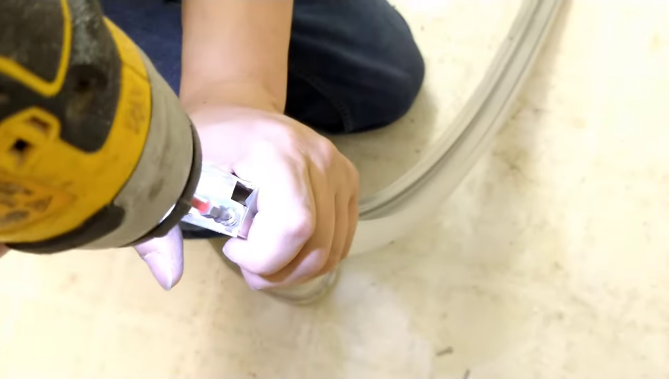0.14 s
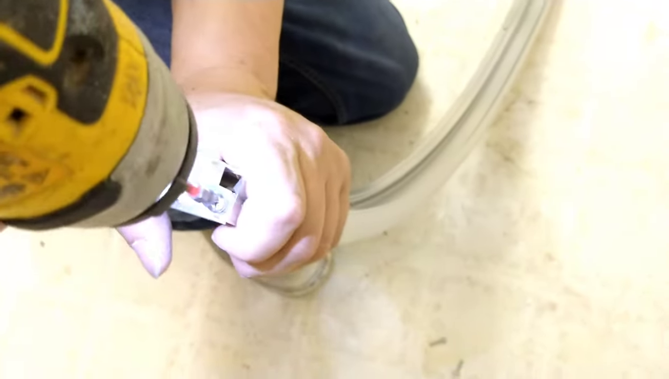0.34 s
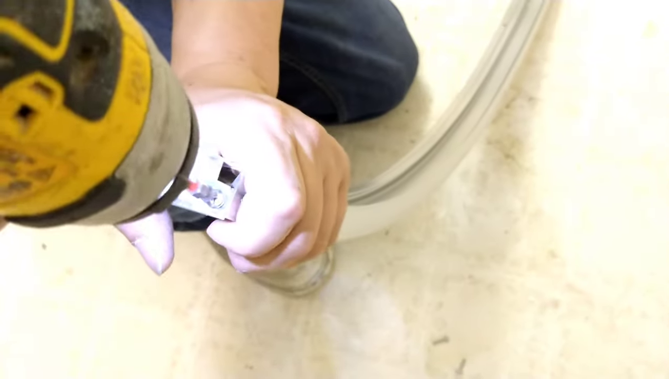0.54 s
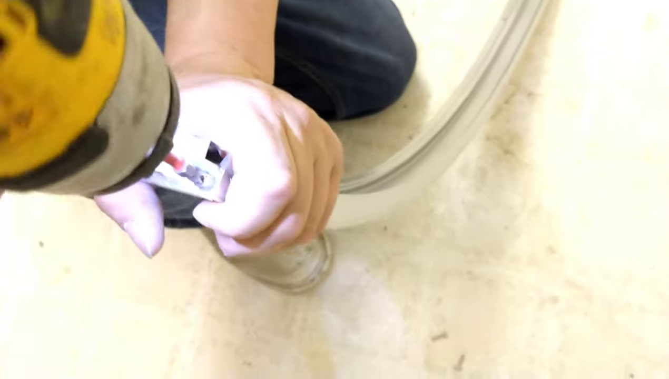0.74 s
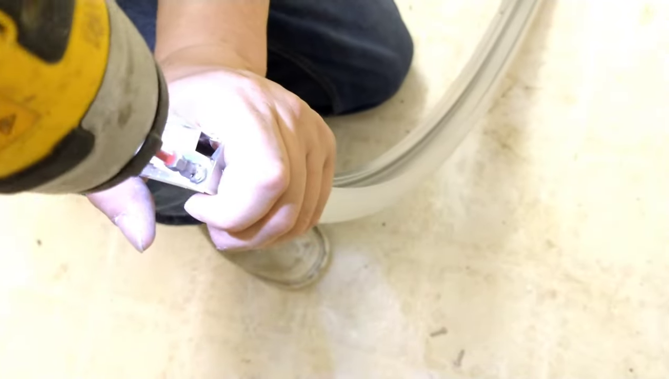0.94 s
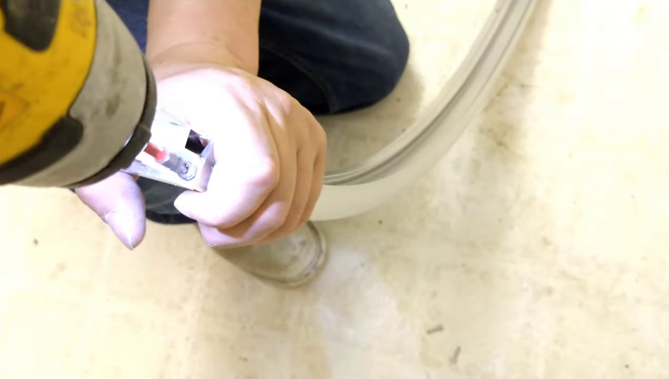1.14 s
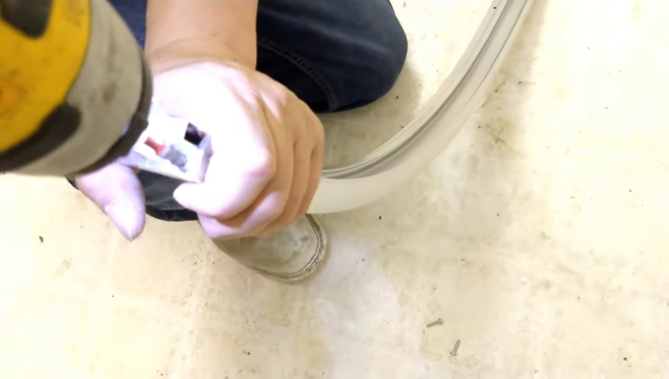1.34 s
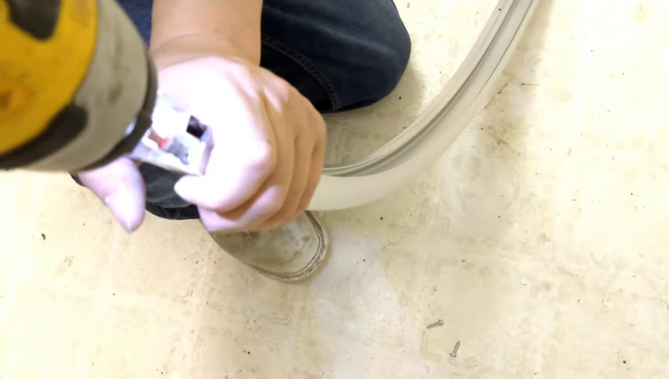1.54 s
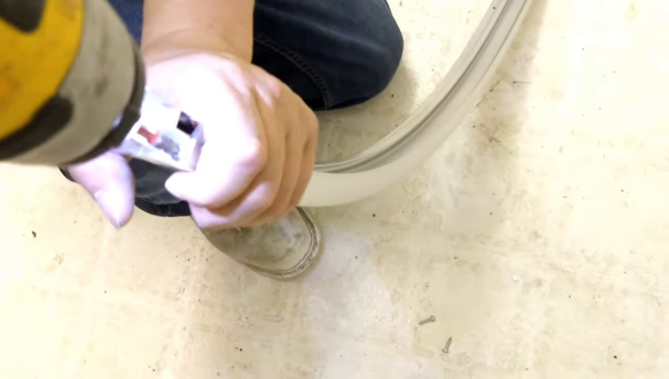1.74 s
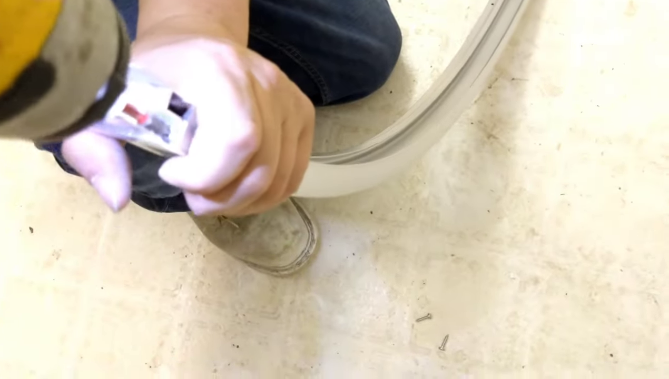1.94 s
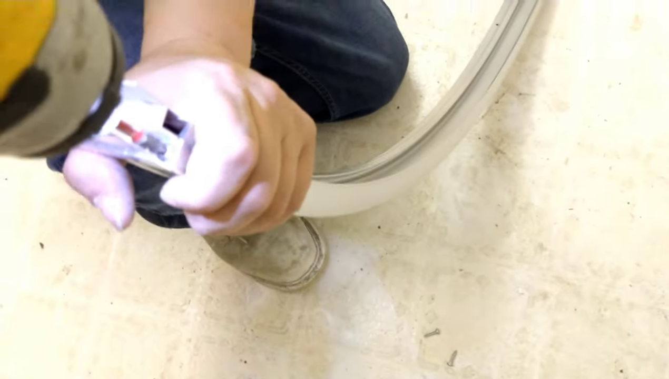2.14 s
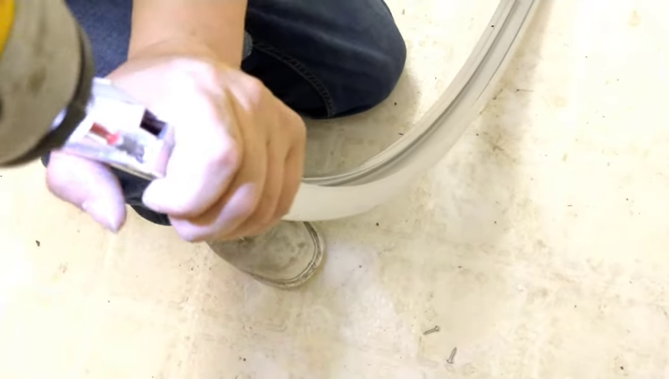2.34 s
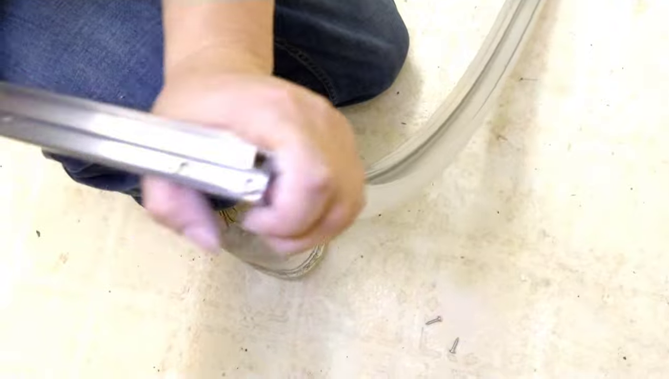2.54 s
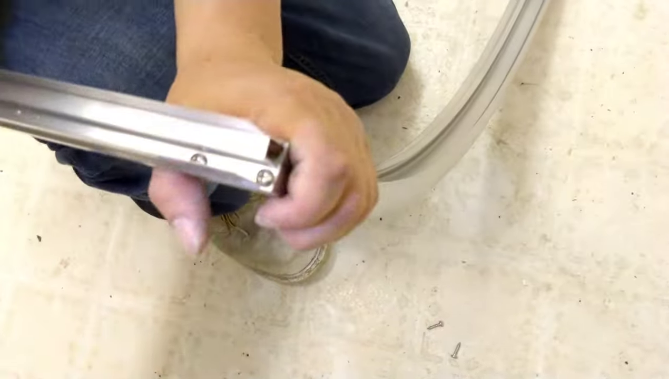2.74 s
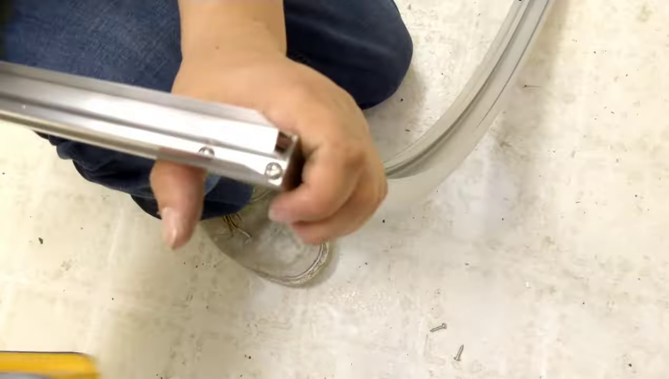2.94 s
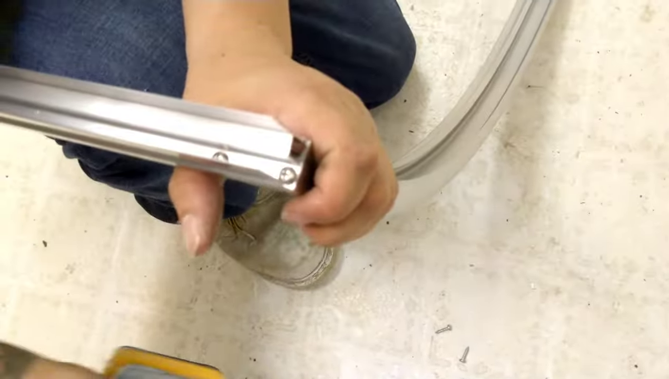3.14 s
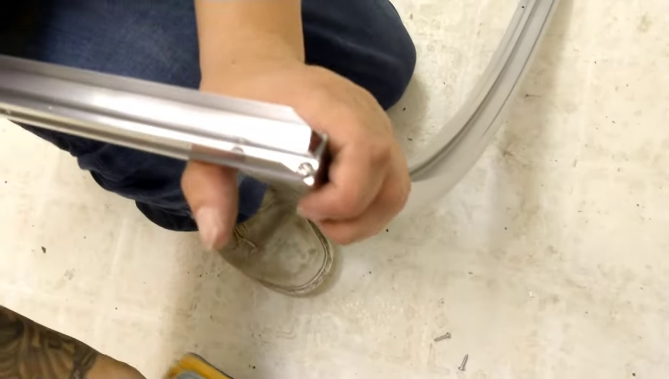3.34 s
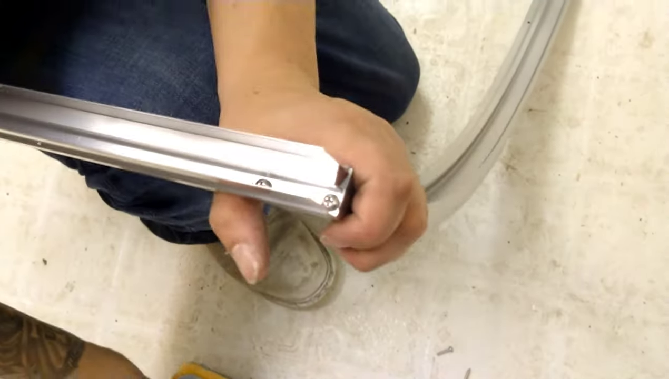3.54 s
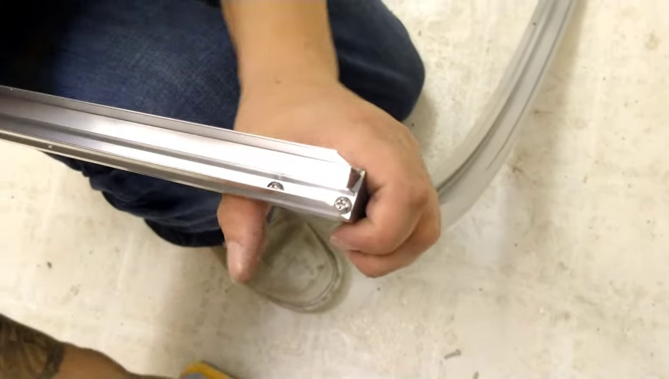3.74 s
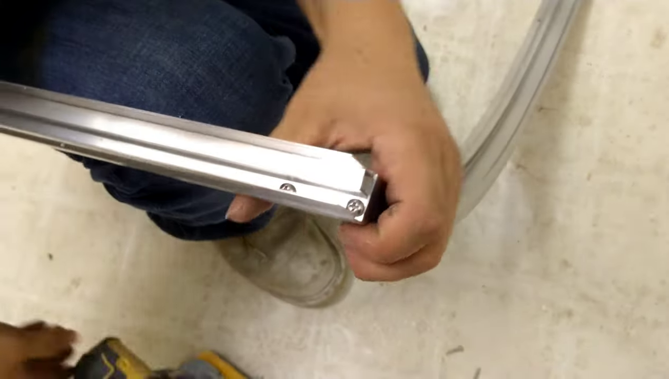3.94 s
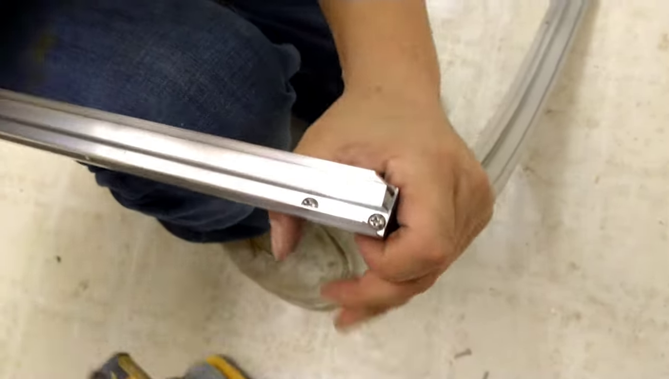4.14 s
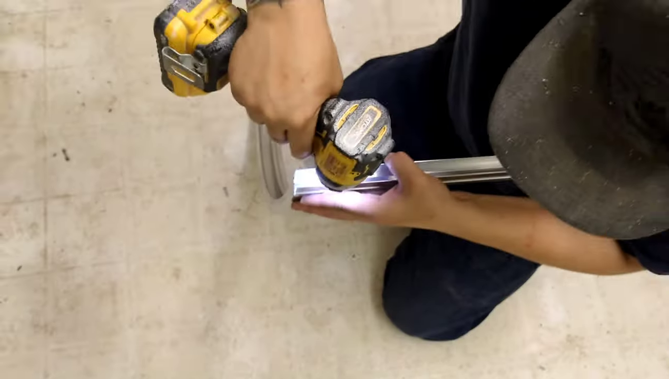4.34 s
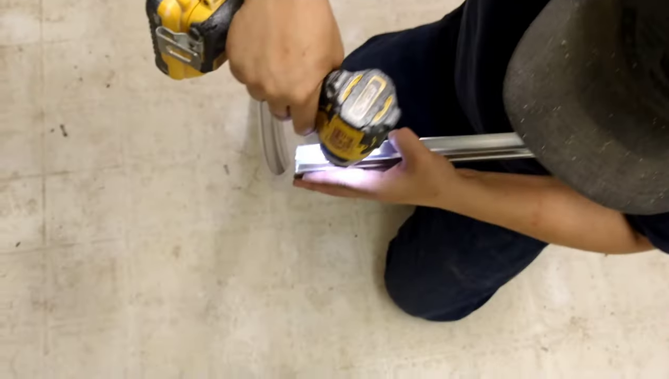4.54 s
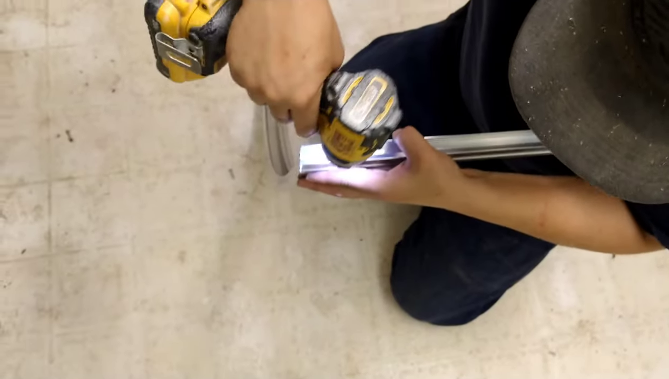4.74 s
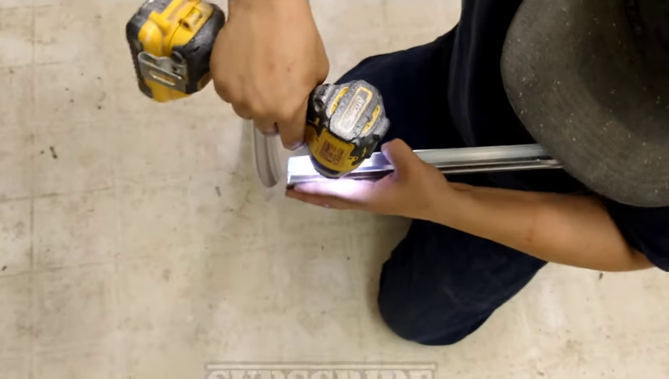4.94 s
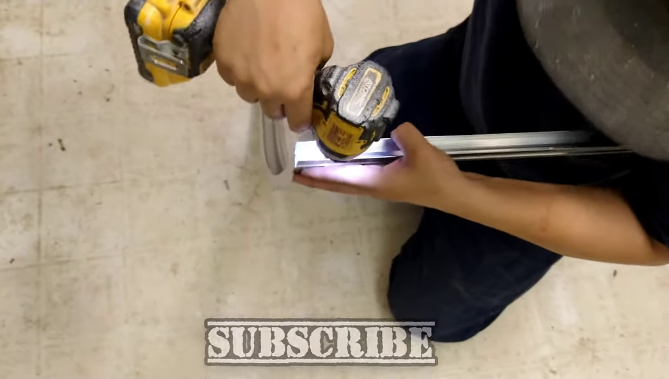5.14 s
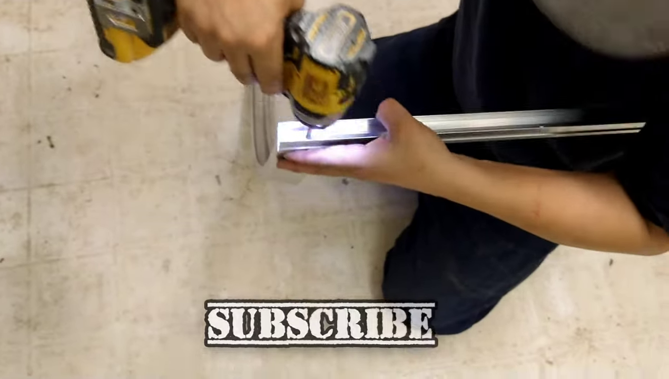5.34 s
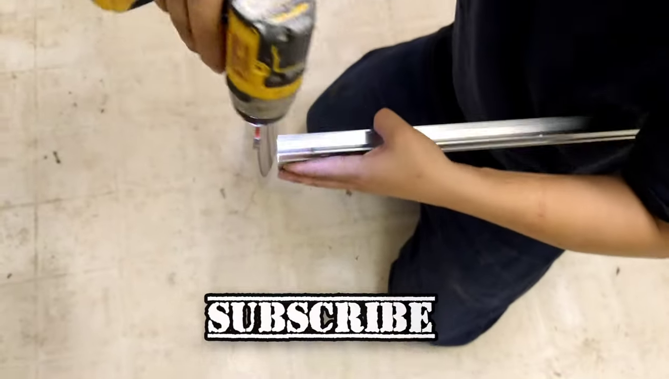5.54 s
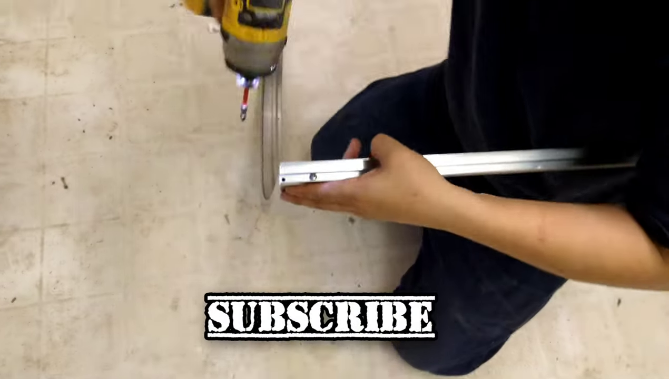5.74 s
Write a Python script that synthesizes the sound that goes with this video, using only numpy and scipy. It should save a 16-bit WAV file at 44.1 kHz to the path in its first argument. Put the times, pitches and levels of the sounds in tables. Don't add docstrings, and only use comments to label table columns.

```python
import sys
import numpy as np
from scipy import signal
from scipy.fft import rfft, irfft
from scipy.io import wavfile
from scipy.ndimage import uniform_filter1d

SR = 44100
rng = np.random.default_rng(int(sys.argv[2]) if len(sys.argv) > 2 else 0)


def persist_wave(psi):
    counts = np.round(np.clip(psi, -1, 1) * 32767).astype(np.int16)
    wavfile.write(sys.argv[1], SR, np.atleast_2d(counts).T)


def level_to_linear(level):
    exponent = np.asarray(level, float) / 20
    return 10 ** exponent


N = 254456
CUT_S, BACK_S, FADE_S = 4.33, 4.363, .01

# (frequency [Hz], level per Hz [dB])
AIR = [(18, -38), (30, -10), (131, 0), (170, -22), (245, -4.5), (1460, -17), (1590, -7), (1860, -15),
       (2680, -12.5), (16000, -32)]
AIR_DB = -69
# (frequency [Hz], decay by 60 dB [s])
ROOM_T60 = [(100, 1), (700, 0.8), (2000, 0.11), (5000, 0.41), (12000, 0.1)]
# (frequency [Hz], likeness [-1 to 1])
LIKENESS = [(60, 0.88), (290, 0.99), (640, 0.7), (1400, 0.5), (15000, 0.048)]
# (frequency [Hz], level [dB])
LEFT_RIGHT = [(60, 0), (110, -2), (200, -0.5), (380, 0.5), (700, -0.5), (1290, 1), (2380, -0.5), (4400, 2),
              (8120, -3.5), (15000, -1.5)]
RIGHT_LAG = (14, 3)
# (frequency [Hz], level [dB])
DISTANCE_LOSS = [(6000, 0.5), (16000, -11)]

# (time [s], peak [dB], main mode [Hz], ring scale [ratio])
THUDS = [
    (0.503, -37, 207, 0.55),
    (1.406, -19, 269.3, 0.22),
    (3.5488, -13.5, 259, 1.0),
    (3.612, -20.5, 262.3, 0.94),
    (3.79, -35, 255, 0.24),
    (3.9375, -16, 311, 0.97),
    (4.143, -30, 122, 0.44),
    (4.2527, -13.5, 271, 0.53),
    (5.03, -17.5, 400, 0.14),
]
# (frequency re main mode [ratio], level [dB], decay by 60 dB [s])
THUD_MODES = [(1.001, 1, 0.39), (.8, -6, 0.7), (.45, -13.5, .4), (1.4, -7.5, 0.51), (1.75, -10, 0.5),
              (2.1, -11.5, .25), (2.6, -10, .2), (1.4, -11.5, .12)]
SETTLE_DB, SETTLE_DB_PER_S, SETTLE_BRIGHT_DB = -24.5, 101, -4

# (start [s], rise [s], track ring [dB], fall [dB/s], brightness [dB])
HANDLING = [(-.01, 0.0065, -59.5, 90, 2.5), (.07, 0.015, -64, 86, 0.5), (.23, .005, -56.5, 200, 3.5),
            (0.256, 0.004, -36.5, 78, 7), (.332, 0.0098, -40, 135, 8), (.43, 0.013, -49, 150, 1.5),
            (0.498, .006, -46, 182, -3), (.642, .008, -23.5, 218.5, 7), (2.27, 0.045, -44.5, 87, -2),
            (2.37, 0.019, -47.5, 250, -2), (2.456, .022, -32.5, 68, 4.5), (2.498, .11, -26.5, 131, 0),
            (2.74, 0.074, -59.5, 47.5, -0.5), (3.215, 0.028, -64.5, 199, -1), (3.37, 0.056, -56, 51, -0.5),
            (3.82, 0.025, -66.5, 100, 5.5), (4.162, 0.057, -55.5, 58.5, 0.5),
            (4.361, 0.013, -40.5, 133.5, 6.5), (5.395, 0.019, -56.5, 151, 24),
            (5.545, 0.0236, -38.5, 102, 0), (5.694, 0.013, -42, 86, -2)]
# (frequency [Hz], level per Hz [dB])
SLIDING = [(18, -53), (30, 3), (190, -1.5), (241, 4), (275, -15.5), (419, -5.5), (748, -12.5), (1340, -16),
           (2520, 9), (4490, -33.5), (8460, -20), (14300, -36), (16400, -41.5)]
# (frequency [Hz], width [Hz], level [dB])
BIT = [(284, 53, -0.5), (737, 34, -2), (2080, 248, 8), (2432, 25, 13.5), (3800, 22, -5),
       (5360, 1200, -13.5), (6010, 80, -11.5), (6670, 53, -17), (7340, 9.6, -12)]
# (frequency [Hz], width [Hz], level [dB])
SQUEAK = (7900, 1340, -18.5)
# (time [s], peak [dB], highs re peak [dB])
TICKS = [(0.2328, -58, -8), (0.2613, -38, -17), (0.3341, -29, -22), (0.4424, -40, -13), (0.5022, -37, -22),
         (2.2565, -55, -1), (2.39, -42, -17), (2.4654, -28, 0), (2.7384, -48, -16), (2.7631, -37, -12),
         (3.5523, -22.5, -15.5), (3.9389, -33.5, -18.5), (4.2541, -39, -18), (5.5528, -39, -34),
         (5.7024, -48, -34)]

# (middle [s], frequency [Hz], level [dB])
HUMS = [(1.03, 496, -42), (1.03, 312, -46), (1.125, 200, -50), (1.125, 351, -46.5), (1.13, 722, -36),
        (1.2, 473, -45.5), (1.24, 757, -37), (1.27, 201, -37), (1.28, 906, -41), (1.345, 300.6, -43),
        (1.345, 600, -40), (1.345, 902, -37.5), (1.44, 718, -25.5), (1.69, 304, -32.5), (3.42, 300, -62)]
HUM_S = 0.071

# (time [s], peak [dB])
BLOWS = [(0.6245, -17), (0.6464, -13), (1.4051, -3), (1.4174, -3), (1.4364, -5), (1.4444, -7), (1.5184, -7),
         (1.5274, -5), (1.5884, -7), (1.6531, -6), (1.719, -4), (1.7854, -6), (1.8602, -4), (1.8864, -5),
         (5.0205, -3), (5.0274, -3), (5.0394, -3), (5.0464, -2)]
BLOW_HIGHS_DB = -13
# (time [s], knock rate [1/s], slack in the gears [0-1])
SPIN = [(.62, 84, 0), (.8, 80, .3), (.87, 78.5, .9), (.93, 77, 1), (.968, 64, 1), (.985, 160, .2),
        (1.4, 153, .1), (1.9, 155, .2), (2.1, 140, 0), (4.54, 200, .2), (4.68, 330, .3), (4.93, 120, 0),
        (4.945, 220, .4), (5.02, 450, .1), (5.4, 200, 0)]
KNOCK_S = .8797
DROP_DB, SLACK_DROP_DB = 4.5, 11.5
# (frequency [Hz], width [Hz], level [dB])
GEAR_CASE = [(4060, 350, 0.5), (5800, 830, -14.5), (2300, 500, -14.5)]
KNOCK_RE_GEAR_DB, KNOCK_TOP_DB, SLACK_KNOCK_DB = 1.5, -30.5, 16.5
# (frequency [Hz], level per Hz [dB])
RUNNING = [(24, -51.5), (40, -22.5), (127, -15), (195, -11), (307, -7), (426, -18.5), (483, -12.5),
           (883, -18), (1000, -15.5), (2540, -8), (5980, -16.5), (15200, -38), (16400, -42)]
# (frequency [Hz], level per Hz [dB])
HAMMERED = [(24, -57), (40, -12.5), (299, -1.5), (621, -11), (741, -6), (799, -9), (1360, -11.5),
            (2130, -4), (2880, -9), (8290, -14.5), (12100, -24), (15200, -21.5), (16400, -34.5)]
# (frequency [Hz], width [Hz], level [dB])
HOUSING = [(205, 12, -13), (718, 31, -9), (914, 46, -12), (1327, 60, -7.5), (1884, 510, -1.5),
           (2310, 100, 5.5), (2420, 23, -0.5), (2563, 170, 5), (3237, 300, -7), (3910, 780, -3.5),
           (6100, 870, -15.5)]
# (frequency [Hz], width [Hz], level [dB])
TRACK = [(730, 47, -7.5), (915, 44, -13.5), (2160, 120, -2), (2620, 60, -9.5), (2990, 40, -9),
         (3430, 25, -8), (4080, 200, -15), (5195, 50, -11.5), (5460, 28, -12), (5870, 80, -12.5),
         (8000, 90, -18.5)]
# (frequency [Hz], width [Hz], level [dB])
FAR_TRACK = [(820, 16, -29), (1903, 33, -4), (2220, 52, -5), (2440, 220, 0), (3600, 29, -27),
             (4556, 38, -2.5), (4930, 160, -8), (5420, 140, -5), (5820, 39, -12.5), (6700, 110, -23),
             (6450, 24, -29.5)]

# (start [s], rise [s], hold [s], track ring [dB], fall [dB/s])
RUNS = [
    (.622, .006, .012, -44.5, 199),
    (.643, .007, 0.0019, -29, 210.5),
    (.65, .03, .12, -34, 40),
    (.97, .03, .32, -29, 122.5),
]
# (start [s], rise [s], hold [s], track ring [dB], fall [dB/s])
HAMMERING = [
    (1.401, .012, 0.015, -23.5, 303.3),
    (1.407, 0.025, .5, -21.5, 92),
]
# (start [s], rise [s], hold [s], track ring [dB], fall [dB/s])
FAR_RUNS = [
    (4.538, .11, .03, -23.5, 95),
    (4.73, 0.024, 0.016, -33.5, 130),
    (4.935, 0.0785, .002, -25, 900),
]
# (start [s], rise [s], hold [s], track ring [dB], fall [dB/s])
FAR_HAMMERING = [
    (5.017, 0.0067, 0.014, -18, 152),
    (5.018, 0.012, 0.11, -25, 89),
]

PART_EDGES_HZ = [60, 1300, 3400, 7000, 16800]
# rows (level [dB]), (share [ratio])
RUN_VOICE = [(-8, 0, -1.7, -11.5), (0.7, 1.3, 0.74, 5)]
# rows (level [dB]), (share [ratio])
HAMMER_VOICE = [(-11, 0, 2.6, -3), (1.57, 1.11, 2.45, 4.5)]
# rows (level [dB]), (share [ratio])
FAR_RUN_VOICE = [(-16.5, 0, -2.5, -10.5), (0.86, 1.22, 1.7, 2.5)]
# rows (level [dB]), (share [ratio])
FAR_HAMMER_VOICE = [(-11.5, 0, 2.8, -2.5), (0.75, 0.94, 1.89, 2.6)]
# rows (level [dB]), (share [ratio])
RUB_VOICE = [(-2, 0, -8.5, -14), (1.75, 1.387, 1.72, 2.5)]
# rows (level [dB]), (share [ratio])
FAR_RUB_VOICE = [(-4, 0.17, -13.5, -34.5), (0.56, 1.12, 1.86, 2)]
BRIGHT_SHARES = (-1.3, 0, 0.8, 1.36)
THROB_DB = (1.5, 3, 4, 6)
THROB_S = .045
SLACK_LOSS_DB = (0.1, 0.1, 4, 3)
FLUTTER_DB = (0.1, 1.199, 1.5, 2.5)
RISE_POWER, KNEE_SHARE = 1.3, 0.37


def rms_one(x):
    return x / np.sqrt(np.mean(x ** 2) + 1e-20)


def at_hz(points, hz):
    table_hz, values = np.transpose(points)
    return np.interp(np.log(hz), np.log(table_hz + 1e-9), values)


def colour(x, points):
    hz = np.maximum(np.fft.rfftfreq(x.shape[-1], 1 / SR), 10)
    return irfft(rfft(x) * level_to_linear(at_hz(points, hz)), x.shape[-1])


def band(x, low_hz, high_hz):
    return signal.sosfilt(signal.butter(3, [low_hz, high_hz], "band", fs=SR, output="sos"), x)


def resonate(x, hz, width_hz):
    r = np.exp(-np.pi * width_hz / SR)
    poles = [1, -2 * r * np.cos(2 * np.pi * hz / SR), r * r]
    return signal.lfilter([(1 - r * r) / 2, 0, (r * r - 1) / 2], poles, x + 1e-18)


def two_ports(x):
    near = np.arange(N) < CUT_S * SR
    return np.array([x, np.where(near, np.roll(x, RIGHT_LAG[0]), np.roll(x, RIGHT_LAG[1]))])


def track(x, spectrum, modes, ring_db):
    rings = sum((-1) ** k * level_to_linear(db) * resonate(x, hz, width) for k, (hz, width, db) in enumerate(modes))
    return colour(x, spectrum) + level_to_linear(ring_db) * rings


def grains(per_s, spread_db, scatter_db):
    sizes = level_to_linear(spread_db * np.minimum(rng.exponential(1, (3, N)), 5))
    sizes = sizes * rng.choice([-1, 1], (3, N))
    contacts = rms_one(sizes * (rng.random((3, N)) < per_s / SR))
    rough = contacts + .5 * rng.standard_normal((3, N))
    return two_ports(rough[0]) + level_to_linear(scatter_db) * band(rough[1:], 510, 19000)


def strokes_db(rows, voice, brightness_db=0):
    t = np.arange(0, N + 32, 32) / SR
    start, rise, hold, level_db, fall = np.transpose(rows)[:, :, None, None]
    part_db, share = np.array(voice)[:, :, None]
    bright_db = np.reshape(brightness_db, (-1, 1, 1)) * np.array(BRIGHT_SHARES)[:, None]
    after = np.maximum(t - start - rise - hold, 0)
    knee = KNEE_SHARE * np.abs(hold)
    db = level_db + part_db + bright_db - share * fall * (np.hypot(after, knee) - knee)
    gain = level_to_linear(db) * np.clip((t - start) / rise, 0, 1) ** RISE_POWER
    gain = gain * ((start > CUT_S) | (t < CUT_S))
    total = 10 * np.log10(np.sum(gain ** 2, axis=0) + 1e-20)
    return np.array([np.interp(np.arange(N) / SR, t, part) for part in total])


def played(x, parts_db):
    parts = [band(x, low, high) for low, high in zip(PART_EDGES_HZ, PART_EDGES_HZ[1:])]
    return sum(part / np.std(part.mean(axis=0)) * level_to_linear(db) for part, db in zip(parts, parts_db))


def room_air():
    return level_to_linear(AIR_DB) * rms_one(colour(rng.standard_normal((2, N)), AIR))


def room(x, early_db, late_db):
    t = np.arange(SR) / SR
    edges = np.geomspace(40, 19000, 12)
    white = rng.standard_normal((2, 2, SR))
    answer = np.zeros((2, SR))
    for k, (low, high) in enumerate(zip(edges, edges[1:])):
        hz = np.sqrt(low * high)
        early = level_to_linear(-60 * t / .04)
        late = level_to_linear(-60 * t / at_hz(ROOM_T60, hz)) * np.minimum(t / 0.011, 1)
        shape = level_to_linear(early_db) * early / np.linalg.norm(early) + level_to_linear(late_db) * late / np.linalg.norm(late)
        mid, side = band(white[k % 2] * shape, low, high)
        alike = np.clip(at_hz(LIKENESS, hz), -1, 1)
        answer += np.sqrt((1 + alike) / 2) * mid + np.sqrt((1 - alike) / 2) * side * [[1], [-1]]
    before = np.arange(N) < CUT_S * SR
    first, second = (signal.fftconvolve((x * part)[None], answer, axes=1)[:, :N] for part in (before, ~before))
    return np.where(before, first, second)


def thuds():
    out = np.zeros(N + SR)
    t = np.arange(SR // 2) / SR
    ratio, db, t60 = np.transpose(THUD_MODES)[:, :, None]
    for s, peak_db, hz, scale in THUDS:
        strength, detune = rng.standard_normal((2, len(THUD_MODES), 1))
        push = rng.standard_normal(len(t))
        tones = np.sin(2 * np.pi * hz * ratio * (1 + .02 * detune) * t)
        modes = np.sum(level_to_linear(db + 1.5 * strength) * level_to_linear(-60 * t / (t60 * scale)) * tones, axis=0)
        dull = band(push, 160, 528) * level_to_linear(-60 * t / (.5 * scale))
        dull = dull + 0.64 * band(push, 600, 980) * level_to_linear(-60 * t / (0.42 * scale))
        hit = modes / np.abs(modes).max() + level_to_linear(-2.5) * dull / np.abs(dull).max()
        first = round(s * SR)
        out[first:first + len(t)] += level_to_linear(peak_db - 2.5) * hit / np.abs(hit).max()
    return band(out[:N], 61, 4500)


def handling():
    clumps = level_to_linear(17 * uniform_filter1d(rng.standard_normal(N), size=300))
    contacts = clumps * grains(4800, spread_db=0.5, scatter_db=7.5)
    rubbing = track(contacts, SLIDING, list(BIT) + [SQUEAK], ring_db=6.0)
    settling = [(s, .005, db + SETTLE_DB, SETTLE_DB_PER_S / scale, SETTLE_BRIGHT_DB)
                for s, db, hz, scale in THUDS]
    start, rise, level_db, fall, brightness_db = np.transpose(list(HANDLING) + settling)
    rows = np.transpose([start, rise, 0 * rise, level_db, fall])
    far = start > CUT_S
    near_db = strokes_db(rows[~far], RUB_VOICE, brightness_db[~far])
    far_db = strokes_db(rows[far], FAR_RUB_VOICE, brightness_db[far])
    return played(rubbing, np.maximum(near_db, far_db))


def strikes(events, crack_s, ring_db, gain_db):
    length = 4096
    out = np.zeros(N + length)
    t = np.arange(length) / SR
    for s, peak_db, high_db in events:
        crack = rng.standard_normal(length) * np.exp(-t / crack_s)
        ring = sum(level_to_linear(db) * resonate(crack, hz, width) for hz, width, db in TRACK)
        body = band(crack + level_to_linear(ring_db) * ring, 1500, 7000)
        edge = band(crack, 7000, 20000)
        hit = body / np.abs(body).max() + level_to_linear(high_db + 1.5) * edge / np.abs(edge).max()
        first = round(s * SR)
        out[first:first + length] += level_to_linear(peak_db + gain_db) * hit
    return out[:N]


def ticks():
    return strikes(TICKS, .0007, ring_db=3.0, gain_db=0.5)


def hums():
    t = np.arange(N) / SR
    return sum(level_to_linear(db) * np.exp(-(2 * (t - s) / HUM_S) ** 2) * np.sin(2 * np.pi * hz * t) for s, hz, db in HUMS)


def hammer_blows():
    return strikes([(s, db, BLOW_HIGHS_DB) for s, db in BLOWS], .0012, ring_db=4.0, gain_db=1.5)


def throb_db():
    t = np.arange(N) / SR
    s = np.array(BLOWS)[:, 0]
    since = t - s[np.maximum(np.searchsorted(s, t) - 1, 0)]
    return -np.array(THROB_DB)[:, None] * np.clip(since / THROB_S, 0, 1)


def gear_knocks(turns, level_db):
    spinning = np.arange(N) / SR > SPIN[0][0]
    clicks = np.diff(np.floor(np.maximum.accumulate(turns)), prepend=0) * spinning
    clicks = clicks * level_to_linear(level_db + rng.normal(0, 2.5, N))
    ring = sum(level_to_linear(db) * resonate(clicks, hz, width) for hz, width, db in GEAR_CASE)
    return 32 * band(ring, 1800, 7200)


def driver():
    s, per_s, slack = np.transpose(SPIN)
    t = np.arange(N) / SR
    slack = np.interp(t, s, slack)
    wobble = uniform_filter1d(rng.standard_normal(N), size=600) * .8
    turns = np.cumsum(np.interp(t, s, per_s)) / SR + wobble
    turns = turns - turns[round(KNOCK_S * SR)]
    gate = level_to_linear(-(DROP_DB + SLACK_DROP_DB * slack) * np.minimum(6.6 * (turns % 1), 1))
    gate = gate / np.sqrt(uniform_filter1d(gate ** 2, size=1300))
    rattle = gate * grains(6000, spread_db=1.0, scatter_db=7.0)
    distant = colour(rattle, DISTANCE_LOSS)

    levels = np.array([strokes_db(RUNS, RUN_VOICE),
                       strokes_db(HAMMERING, HAMMER_VOICE) + throb_db(),
                       strokes_db(FAR_RUNS, FAR_RUN_VOICE),
                       strokes_db(FAR_HAMMERING, FAR_HAMMER_VOICE)])
    waver = uniform_filter1d(uniform_filter1d(rng.standard_normal(N), size=900), size=900)
    levels = levels + np.outer(FLUTTER_DB, rms_one(waver)) - np.outer(SLACK_LOSS_DB, slack)
    out = played(track(rattle, RUNNING, HOUSING, ring_db=4.5), levels[0])
    out += played(track(rattle, HAMMERED, TRACK, ring_db=-2.5), levels[1])
    out += played(track(distant, RUNNING, FAR_TRACK, ring_db=3.0), levels[2])
    out += played(track(distant, HAMMERED, FAR_TRACK, ring_db=2.0), levels[3])

    gear_db = np.max(levels, axis=0)[2]
    knock_db = np.minimum(gear_db + KNOCK_RE_GEAR_DB, KNOCK_TOP_DB) + SLACK_KNOCK_DB * slack
    return out, gear_knocks(turns, knock_db)


def scene():
    low = thuds() + hums()
    rattle, knocks = driver()
    steady = rattle + handling()
    hits = hammer_blows() + ticks()
    mix = room_air() + steady + two_ports(hits + knocks + low)
    mix = mix + room(steady[0], early_db=-9.5, late_db=-9.5)
    mix = mix + room(hits + .3 * low, early_db=-5, late_db=-6)
    t = np.arange(N) / SR
    return mix * np.clip(np.maximum((CUT_S - t) / .003, (t - BACK_S) / FADE_S), 0, 1)


def roll_off(x):
    return signal.sosfilt(signal.butter(12, 16510, fs=SR, output="sos"), x)


def record(dry):
    left_half = [(hz, db / 2) for hz, db in LEFT_RIGHT]
    right_half = [(hz, -db / 2) for hz, db in LEFT_RIGHT]
    ports = np.array([colour(dry[0], left_half), colour(dry[1], right_half)])
    rounded = 1.1 * np.tanh(ports / 1.1)
    top = signal.cheby2(16, 60, 16350, fs=SR, output="sos")
    return roll_off(signal.sosfilt(top, rounded))


dry = scene()
out = record(dry)
persist_wave(out)
```